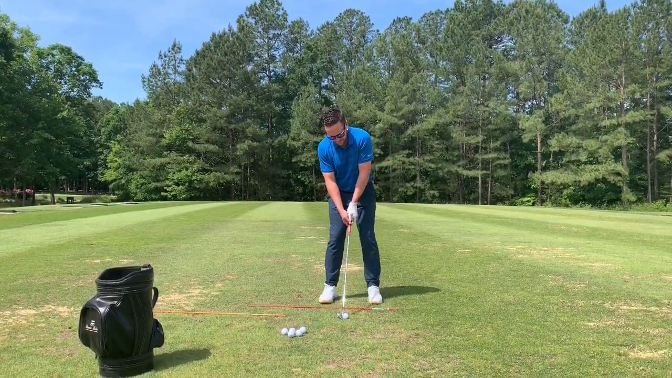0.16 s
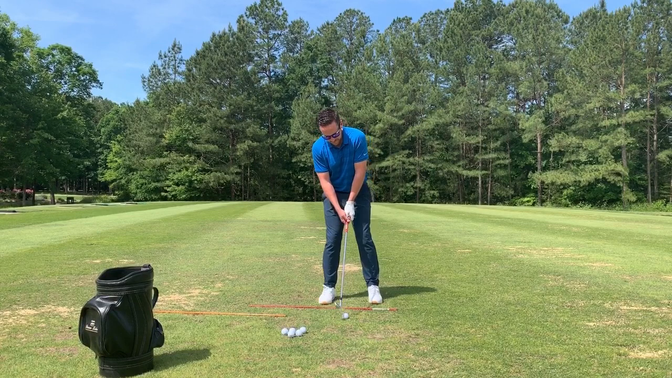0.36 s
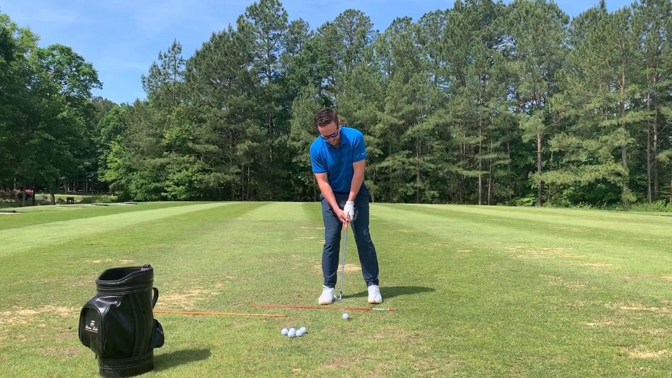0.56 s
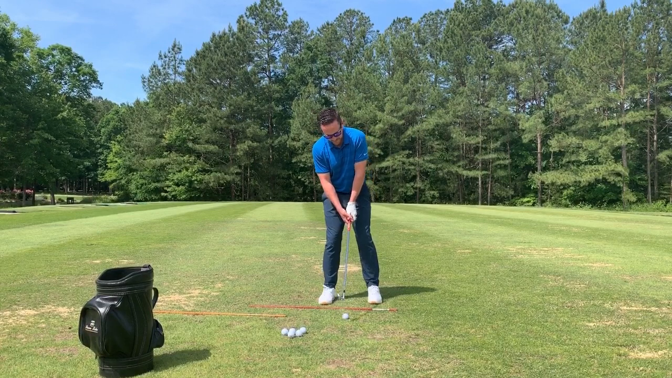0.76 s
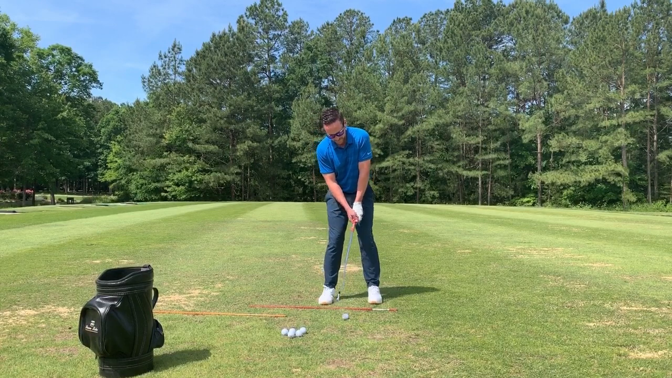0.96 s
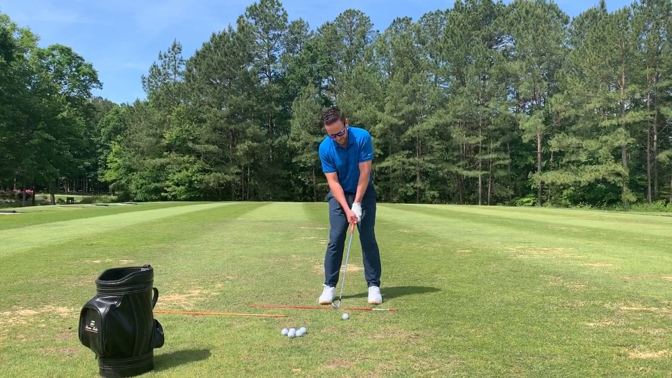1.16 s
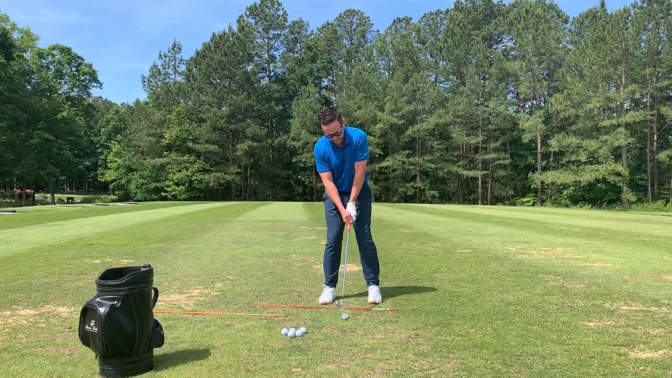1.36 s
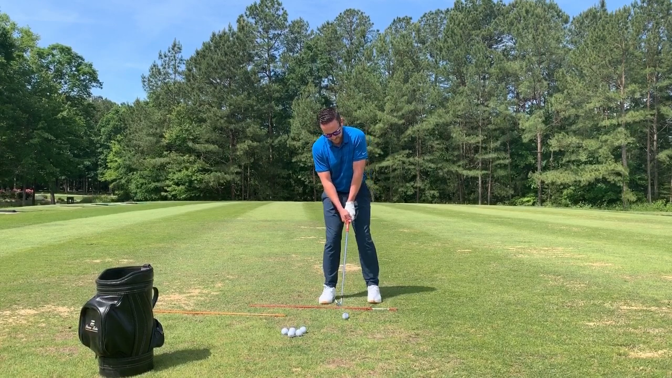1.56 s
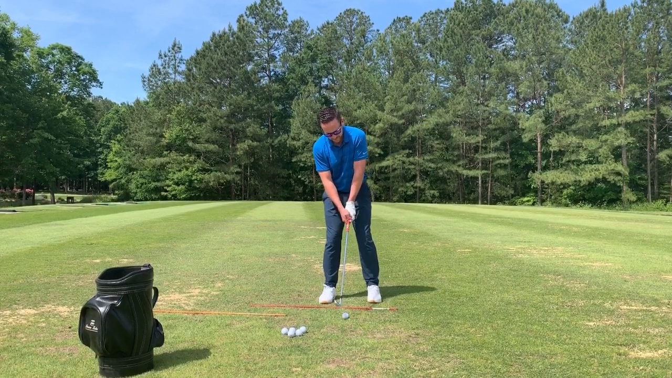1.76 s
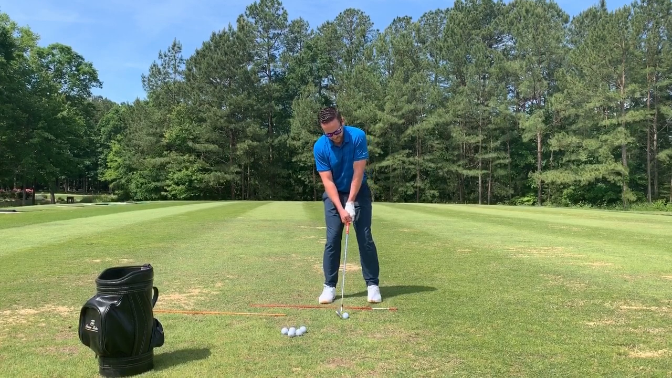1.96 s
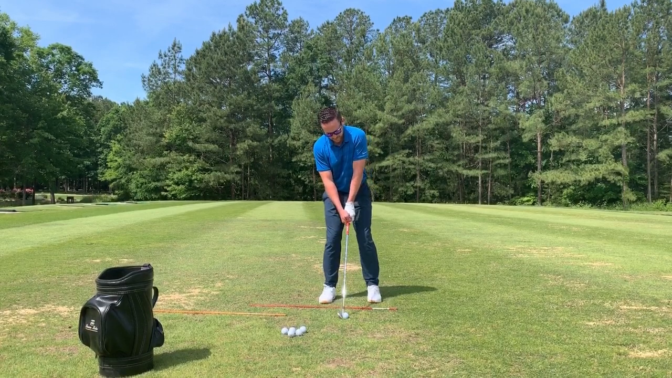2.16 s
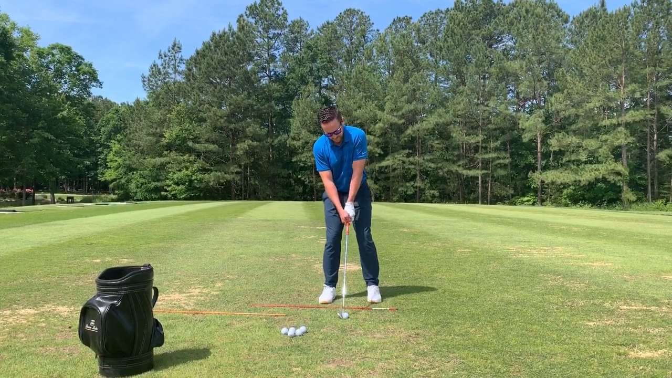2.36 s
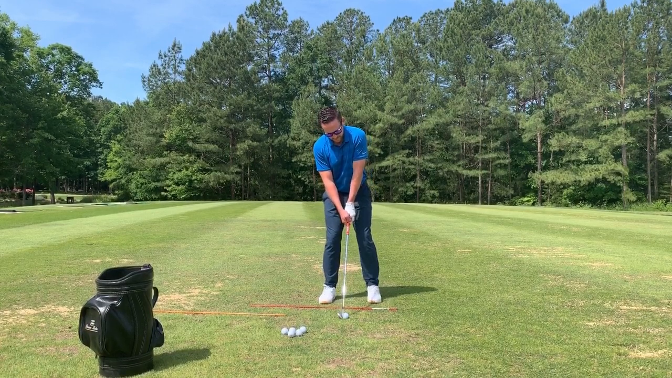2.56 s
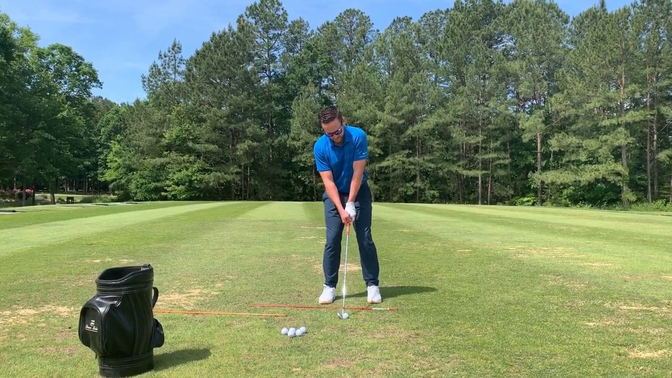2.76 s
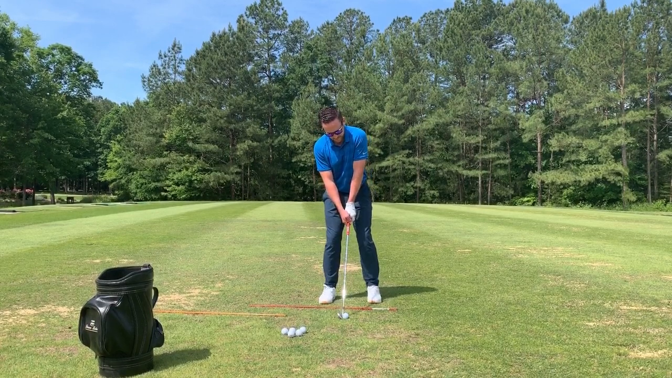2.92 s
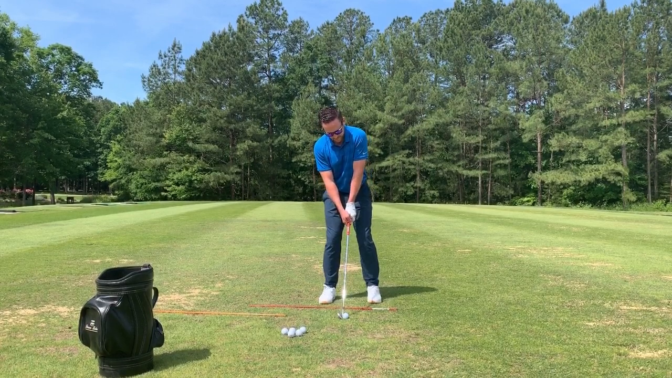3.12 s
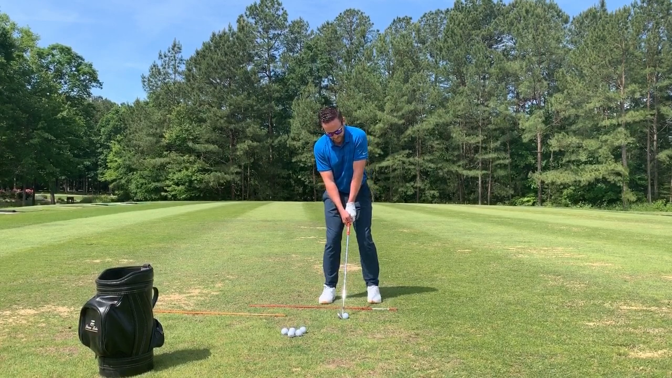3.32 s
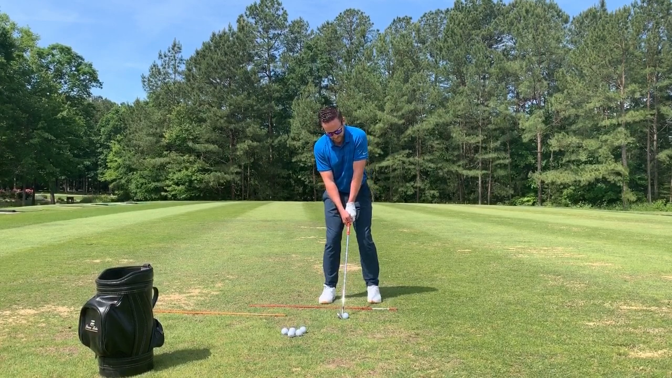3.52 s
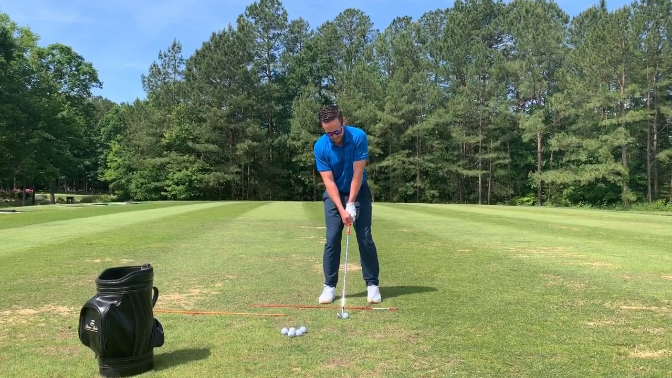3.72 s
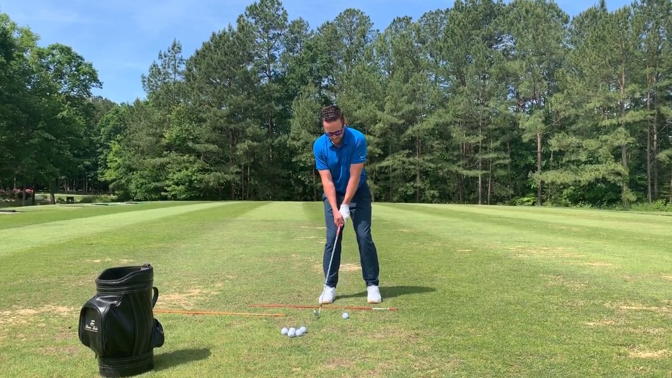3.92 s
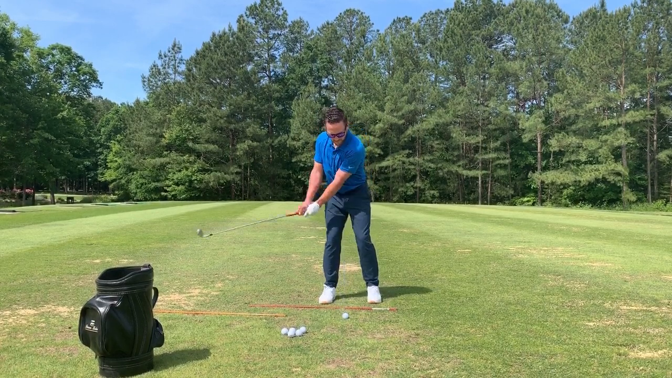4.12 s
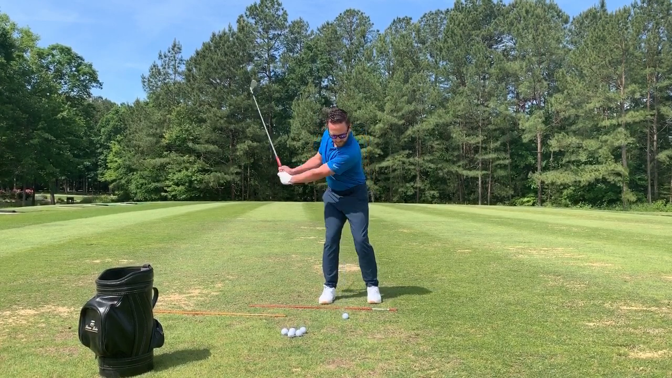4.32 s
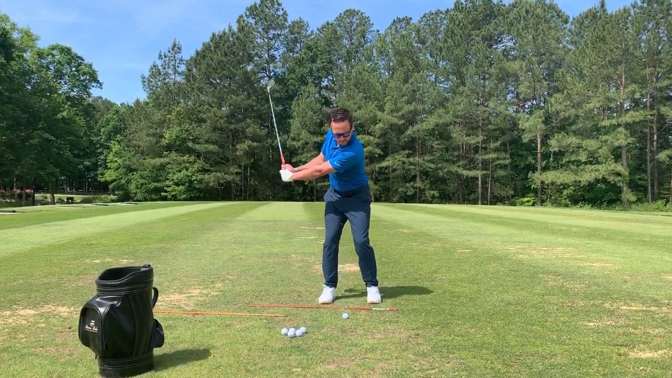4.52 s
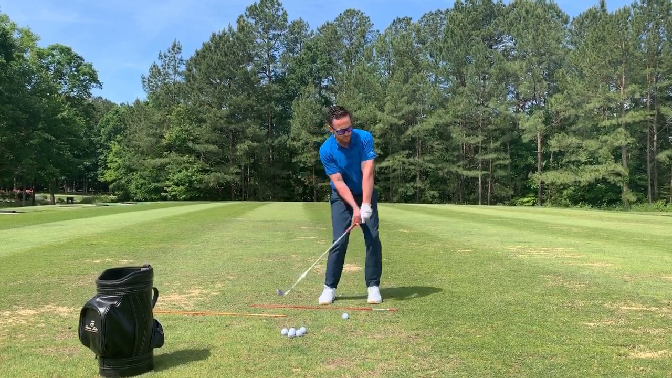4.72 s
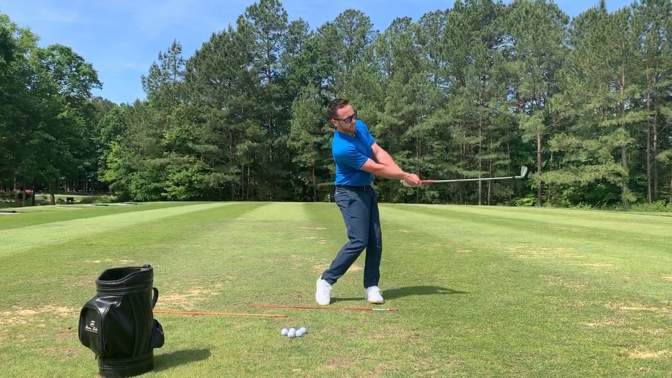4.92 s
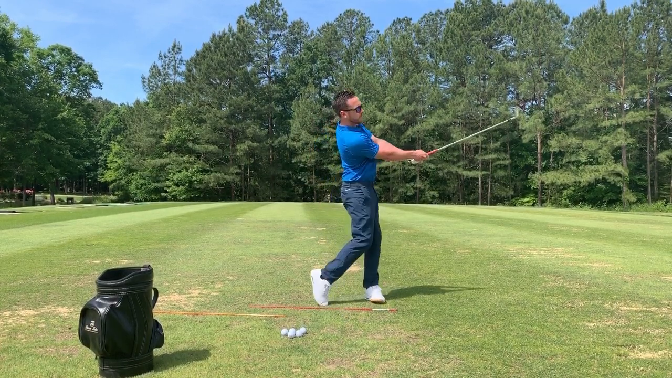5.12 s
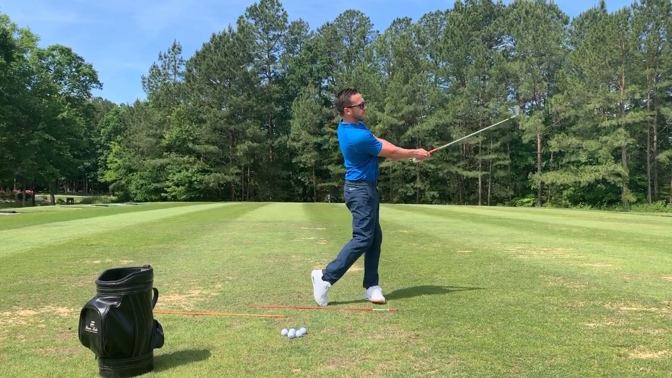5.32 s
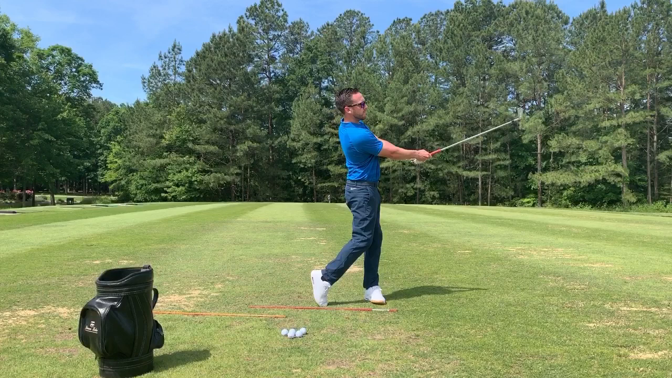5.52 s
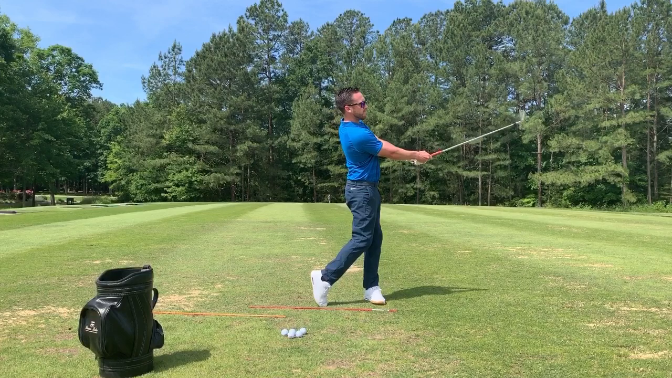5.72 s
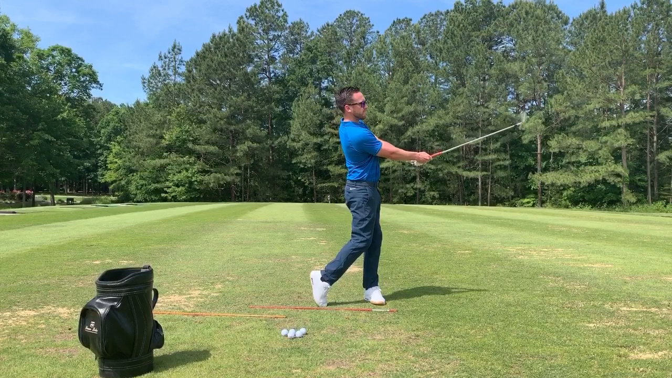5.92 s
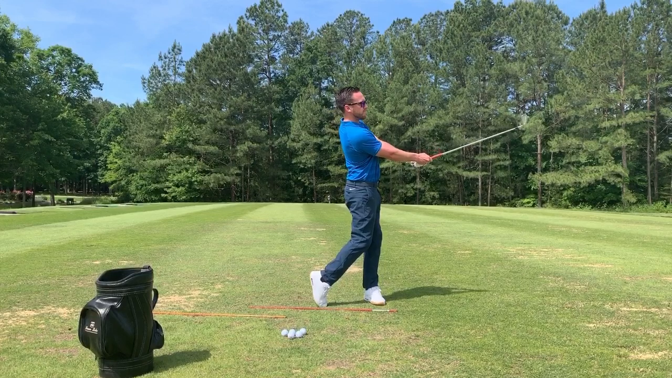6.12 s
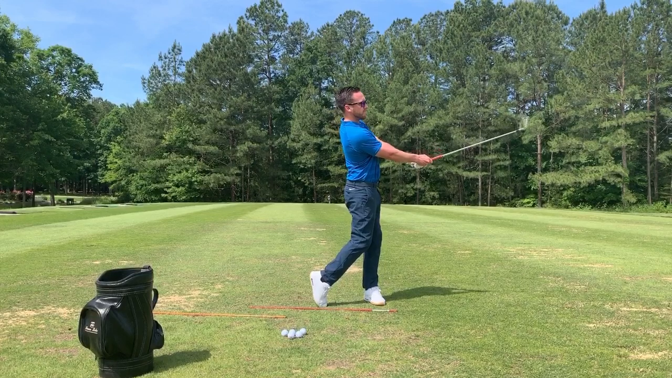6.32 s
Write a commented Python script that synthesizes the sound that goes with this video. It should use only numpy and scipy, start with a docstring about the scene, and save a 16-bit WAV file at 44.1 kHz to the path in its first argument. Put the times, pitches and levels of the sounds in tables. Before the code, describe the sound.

Small birds whistle, peep and buzz faintly in the trees over a low outdoor rumble and softly rustling leaves. A distant engine speeds up, changes gear and drones on. Late on, a nearby golf iron gives a brief swish and strikes a ball with one sharp click and a thump of turf. A little grass and soil scatters, the click echoes faintly off the trees, and the birds carry on.

```python
"""Iron shot on a wooded golf range

An iron swishes down and strikes a ball off turf: the face clicks, the ball rings, the ground
thumps, then grass and soil fly and the trunks throw the click back. Birds whistle, peep and
buzz among the trees. Far off, an engine speeds up and changes gear over a low hum, thin
whines, rumble and rustling leaves."""
import sys
import numpy as np
from scipy import signal
from scipy.fft import rfft, irfft, next_fast_len
from scipy.io import wavfile
from scipy.ndimage import map_coordinates

SR = 44100
rng = np.random.default_rng(int(sys.argv[2]) if len(sys.argv) > 2 else 0)


def pcm_store(signal):
    """Save signal as 16-bit PCM."""
    levels = np.round(np.clip(np.atleast_2d(signal), -1, 1) * 32767)
    wavfile.write(sys.argv[1], SR, levels.astype(np.int16).T)


N = 285588
TIME = np.arange(N) / SR
CONTACT_S = 4.8422
DIG_S = CONTACT_S + 0.0062  # the sole tears the turf just after contact

# Tone colour of brushed and flying grass: freq_hz, level_db
GRASS_COLOUR = [(300, -35), (600, -7), (1400, -4.5), (3000, -12.5), (6500, -19.5), (10000, -38),
                (16000, -59)]


def amp(db):
    return 10 ** (np.asarray(db) / 20)


def unit(x):
    return x / np.sqrt(np.mean(x ** 2) + 1e-20)


def phase(hz):
    return 2 * np.pi * np.cumsum(hz) / SR


def along(points, hz):
    """Read (freq_hz, value) points on a log frequency axis."""
    freqs, values = np.transpose(points)
    return np.interp(np.log(hz + 1), np.log(freqs + 1), values)


def curves(rows):
    """One value per sample for each column after the time."""
    times, *columns = np.transpose(rows)
    return [np.interp(TIME, times, column) for column in columns]


def wobble(rate):
    """A smooth random curve, rate knots a second."""
    return map_coordinates(rng.standard_normal(int(N * rate / SR) + 4), [TIME * rate])


def tent(start_s, end_s, db, rise_db_s=0, fall_db_s=0):
    """Gain that rises until start_s, holds until end_s and falls; slopes in dB per second."""
    early, late = np.maximum(start_s - TIME, 0), np.maximum(TIME - end_s, 0)
    return amp(db - rise_db_s * early - fall_db_s * late)


def filtered(x, response):
    """Equalise x by a gain per frequency; mirrored ends keep the edges free of clicks."""
    edge, size = SR // 10, next_fast_len(N + SR // 2)
    padded = np.pad(x, [(0, 0), (edge, edge)], "reflect")
    spectrum = rfft(padded, size) * response(np.fft.rfftfreq(size, 1 / SR))
    return irfft(spectrum, size)[..., edge:edge + N]


def bandpass(x, order, band_hz):
    return signal.lfilter(*signal.butter(order, band_hz, "bandpass", fs=SR), x)


def panned(x, balance):
    """Pan each frequency by its own amount."""
    return filtered(x, lambda hz: amp(along(balance, hz) * [[.5], [-.5]]))


def rush(colour, likeness):
    """Coloured stereo noise of rms 1; likeness is the left-right correlation by frequency."""
    def mid_side_gains(hz):
        angle = np.arccos(np.clip(along(likeness, hz), -1, 1)) / 2
        return amp(along(colour, hz)) * [np.cos(angle), np.sin(angle)]
    mid, side = filtered(rng.standard_normal((2, N)), mid_side_gains)
    return unit(np.array([mid + side, mid - side]))


def add(out, start_s, sound, pan_db=0):
    """Mix a sound in at start_s; pan_db is left minus right."""
    at = round(start_s * SR)
    part = out[:, max(at, 0):][:, :sound.shape[-1] + min(at, 0)]
    stereo = amp([[pan_db / 2], [-pan_db / 2]]) * sound
    part += stereo[:, max(-at, 0):][:, :part.shape[1]]


def during(curve, start_s, length_s):
    """A note-long stretch of a modulation curve."""
    return curve[round(abs(start_s) * SR):][:round(length_s * SR)]


def note(pitch, db):
    """A sine on a pitch track, with soft ends."""
    envelope = np.abs(np.sin(np.linspace(0, np.pi, len(pitch)))) ** 0.49
    return amp(db) * np.sqrt(2) * envelope * np.sin(phase(pitch))


def woods(x, dry_db, wet_db, t60_s):
    """The sound trails off among the trunks; moving leaves blur the answer."""
    t = np.arange(round(.6 * SR)) / SR
    tail = rng.standard_normal((2, len(t))) * amp(-60 * t / t60_s)
    blur = unit(1 + 1.3 * wobble(250))
    wet = signal.fftconvolve(blur * x, tail / np.linalg.norm(tail[0]), axes=1)[:, :N]
    return amp(dry_db) * x + amp(wet_db) * wet


def air():
    """Low rumble, leaves and far traffic swell with the gusts over a steady faint high hiss."""
    # Ambience levels: time_s, rumble_db, leaves_and_traffic_db
    levels = [(0.0, -47.5, -62.5), (0.83, -46, -60.5), (1.49, -48, -61), (2.29, -50, -65.5),
              (4.02, -50.5, -65.5), (5.1, -48, -64.5), (6.48, -51, -70)]
    # Tone colours of the three beds: freq_hz, level_db
    rumble_colour = [(15, -25.5), (30, -14.5), (42, -8), (65, -2.5), (110, -10), (180, -19), (320, -37),
                     (500, -55), (1000, -120)]
    leaves_colour = [(150, -30.5), (250, -3), (339, -7.5), (493, -9), (541, -10.5), (838, -16.5),
                     (1350, -18), (2670, -30.5), (3520, -39), (6000, -49.5), (7800, -79.5), (13200, -120)]
    hiss_colour = [(2060, -28), (3500, -2.5), (4460, -2.5), (7230, -8.5), (9260, -2), (10500, -8),
                   (11300, -19), (13700, -2), (16000, -24)]
    # Stereo likeness: freq_hz, correlation
    likeness = [(60, 0.93), (130, 0.93), (290, 0.86), (640, 0.088), (1410, -0.033), (3100, -0.46),
                (6820, 0.21), (15000, -0.06)]
    # Stereo balance: freq_hz, pan_db
    balance = [(60, -3.5), (240, -0.5), (950, 0), (3770, 1), (15000, -7)]
    rumble_db, leaves_db = curves(levels)
    gust = wobble(2.3)
    rumble = amp(rumble_db + 0.92 * gust) * rush(rumble_colour, likeness)
    leaves = amp(leaves_db + .8 * gust + .7 * wobble(11)) * rush(leaves_colour, likeness)
    hiss = amp(-83) * rush(hiss_colour, [(1000, 0.042)])
    return panned(rumble + leaves, balance) + hiss


def hum(pitch_hz=51, level_db=-49, swell_db=3.5):
    """A low machine hum that drifts in pitch and slowly swells."""
    swell = amp(swell_db * wobble(7.5))
    return amp(level_db) * unit(swell * np.sin(phase(pitch_hz + 1.8 * wobble(8.2))))


def whines(fade_db_s=60.5):
    """Thin, wavering machine tones fade in, hold and fade out."""
    # Held tones: start_s, end_s, pitch_hz, level_db
    tones = [(2.095, 3.4, 539, -73), (3.7, 4.2, 544.3, -75.5), (5.6, 5.8, 1775, -83),
             (6.33, 6.41, 1780, -82)]
    out = np.zeros(N)
    for start_s, end_s, hz, db in tones:
        tone = amp(4 * wobble(16)) * np.sin(phase(hz * (1 + .006 * wobble(28))))
        out += tent(start_s, end_s, db, fade_db_s, fade_db_s) * unit(tone)
    return out


def engine():
    """A far engine's firing harmonics sweep through exhaust resonances and flutter on their way."""
    # It pulls, changes gear and drives off: time_s, firing_hz, level_db, loss_per_order_db, flutter_db
    drive = [(0, 119.3, -53, -2, 1), (.4, 135.5, -48, 1, 1.5), (.6, 142.4, -47.5, -1, 1.5),
             (.8, 150.9, -45, 7, 1), (1.1, 162.3, -46.5, 7, 1.5), (1.4, 172.5, -57.5, 0.5, 2.5),
             (2.2, 190.4, -59, 3, 3), (2.4, 180.3, -70, 11, 4), (2.75, 110, -64.5, 8, 3.5),
             (2.95, 107.8, -52, 5.5, 3), (3.4, 107.2, -53, -1, 3), (3.8, 109.3, -51, -1, 3),
             (4.2, 112.9, -53, 7.5, 2.5), (4.6, 115.7, -55.5, 6, 3), (5.1, 117.1, -66.5, 6.5, 3),
             (6.48, 110.5, -58, 17, 3)]
    # First to fourth order of the firing: level_db
    orders = [0, -10, -17.5, -29.5]
    # Exhaust resonances: freq_hz, gain_db
    exhaust = [(110, -1.5), (150, 3), (188, -3.5), (225, 1.5), (272, 6), (330, -4), (425, 0), (480, -11),
               (565, 7.5), (650, -13)]
    firing_hz, level_db, loss_db, flutter_db = curves(drive)
    firing = phase(firing_hz * (1 + .015 * wobble(18)))
    out = np.zeros(N)
    for order, order_db in enumerate(orders, start=1):
        db = level_db + order_db - (order - 1) * loss_db + along(exhaust, order * firing_hz)
        db += flutter_db * (.6 * wobble(7.7) + wobble(22))
        jitter = flutter_db / 3.5 * wobble(16)
        out += amp(db) * np.sqrt(2) * np.sin(order * firing + jitter)
    return out


def ticks(t60_s=0.012):
    """Faint dry ticks: puffs of noise that die within milliseconds."""
    # Ticks: start_s, level_db, centre_hz
    puffs = [(4.14, -57.5, 3300), (5.0745, -61, 8000), (5.13, -67, 8500), (5.36, -68, 10500)]
    out, t = np.zeros((2, N)), np.arange(SR // 100) / SR
    for start_s, db, hz in puffs:
        puff = amp(db - 60 * t / t60_s) * rng.standard_normal((2, len(t)))
        add(out, start_s, bandpass(puff, 2, [.6 * hz, 1.45 * hz]))
    return out


def chirps(centre_hz, spread, count):
    """Many tiny steep chirps at random moments deep in the woods, rms 1."""
    out = np.zeros((2, N))
    for when, high, slide, loud, side, length in rng.random((count, 6)):
        glide = np.linspace(1, 1.12 - 0.53 * slide, round((0.008 + 0.012 * length) * SR))
        pitch = centre_hz * np.exp(spread * (2 * high - 1)) * glide
        add(out, when * N / SR, note(pitch, 9 * loud), pan_db=8 * (side - .5))
    return unit(woods(out, dry_db=-8, wet_db=0, t60_s=.4))


def far_chatter(rasp):
    """Small birds chatter far away in two registers, the upper one raspy."""
    # Chatter levels: time_s, low_voices_db, high_voices_db
    levels = [(0, -69.5, -86), (.7, -76.5, -91), (1.2, -81.5, -91), (2.2, -100, -93), (2.4, -100, -84),
              (2.9, -93, -82), (3.6, -79.5, -86), (4.3, -90.5, -91.5), (6.48, -75.5, -93)]
    low_db, high_db = curves(levels)
    low = amp(low_db) * chirps(2350, spread=.115, count=500)
    high = amp(high_db) * rasp * chirps(4000, spread=.17, count=800)
    return low + high


def bird_peeps(quaver, roughness):
    """Short rough peeps and tiny high pips, each a straight glide."""
    # Scattered peeps: start_s, length_s, pitch_hz, level_db, glide_hz
    peeps = [(.595, 0.018, 3500, -71.5, 100), (2.615, 0.058, 3210, -76.5, 152),
             (2.665, 0.11, 6200, -90, 182), (2.64, 0.018, 4520, -83, 100), (2.72, .02, 4500, -82, -100),
             (2.8, 0.019, 4450, -83, -200), (2.845, 0.08, 4963, -81, -420), (2.9, .045, 3250, -82, -300),
             (2.74, .03, 3720, -82, 0), (2.86, 0.013, 3980, -83, 0), (2.99, 0.061, 4010, -83, 200),
             (3.025, 0.051, 3080, -76, -150), (3.115, .08, 3950, -83, -150), (3.41, 0.028, 3600, -76, 203),
             (3.525, 0.03, 4037, -78, 0), (4.09, .02, 8250, -82, 0), (5.436, 0.031, 3290, -76.5, -50),
             (6.0, 0.029, 2000, -73, 60), (6.052, 0.02, 3680, -77.5, 0)]
    # A row of rising pips: start_s, level_db
    pips = [(5.355, -84), (5.449, -89), (5.54, -88), (5.635, -86), (5.73, -85)]
    calls = peeps + [(s, .02, 5320, db, 300) for s, db in pips]
    out = np.zeros((2, N))
    for start_s, length_s, hz, db, glide_hz in calls:
        pitch = hz + glide_hz * np.linspace(-.5, .5, round(length_s * SR))
        add(out, start_s, note(pitch * during(quaver, start_s, length_s), db))
    return woods(roughness * out, dry_db=-5.5, wet_db=-5, t60_s=.35)


def bird_buzzes():
    """A fast, irregular warble in pitch turns high notes into buzzes."""
    # A repeated buzz: start_s, level_db
    buzzes = [(.468, -79), (1.142, -78.5), (1.775, -80.5), (2.485, -79.5), (3.235, -79), (3.945, -82),
              (5.605, -81), (6.31, -79)]
    # A high buzzy phrase: start_s, pitch_hz, level_db
    trill = [(3.179, 8970, -74), (3.362, 8710, -70.5), (3.534, 8840, -70.5), (3.736, 8860, -71.5),
             (3.905, 8620, -77.5)]
    warble = np.sin(phase(110 + 45 * wobble(78)))
    out = np.zeros((2, N))

    def buzz(start_s, hz, db, length_s, width_hz, dwell, pan_db):
        """With dwell, the warble lingers at the bottom and flicks upward."""
        bend = during(warble, start_s, length_s)
        tone = note(hz + width_hz * (bend + dwell * bend ** 2), db - 5 * dwell * bend)
        add(out, start_s, tone * np.hanning(len(bend)) ** 0.5, pan_db)

    for start_s, db in buzzes:
        buzz(start_s, 6760, db, length_s=0.078, width_hz=640, dwell=.5, pan_db=-2)
    for start_s, hz, db in trill:
        buzz(start_s, hz, db, length_s=0.051, width_hz=260, dwell=0, pan_db=-1.5)
    return woods(out, dry_db=-4.5, wet_db=2, t60_s=0.3)


def bird_whistles(quaver, rasp, hoarse, song_pan_db=4.5, fall_hz_per_s=1400, rasp_below_hz=1800):
    """A songbird and a raspy low-voiced bird whistle gliding, slightly hoarse sines."""
    # Low bird's loud arch and soft second note: start_s, level_db, second_after_s, second_db
    low_calls = [(-.08, -57.5, 0.4, -69), (0.662, -64.5, 0.35, -73), (1.289, -64.5, .405, -73),
                 (1.919, -66, 0.41, -75)]
    # Songbird's arched, level, hooked and falling notes: start_s, length_s, pitch_hz, level_db
    arches = [(5.597, 0.115, 3028, -70.5), (6.202, 0.08, 3075, -69)]
    held = [(0.344, 0.045, 2990, -75), (0.857, 0.09, 3050, -67), (0.95, 0.17, 2990, -76),
            (3.266, 0.078, 2900, -78), (3.328, 0.053, 2590, -72), (3.641, 0.066, 2960, -75),
            (4.521, 0.11, 2877, -76), (4.597, 0.058, 2604, -71), (5.133, 0.049, 2220, -69),
            (5.2, 0.048, 2330, -70), (5.825, .03, 2170, -74), (6.309, 0.077, 2277, -74.5)]
    chips = [(0.07, 0.05, 2560, -73), (0.289, 0.041, 2560, -67.5), (0.392, 0.13, 2505, -71),
             (0.51, 0.038, 2560, -68), (0.848, 0.013, 3680, -70), (0.932, 0.019, 2930, -67),
             (0.924, .04, 2560, -72), (1.125, 0.035, 2590, -67.5), (3.175, 0.055, 2600, -76),
             (3.886, 0.065, 2535, -71.5), (4.441, 0.065, 2630, -72.5), (5.89, 0.038, 2550, -79),
             (6.23, .07, 2520, -76), (6.44, 0.042, 2500, -74)]
    falls = [(3.737, 0.18, 2760, -74.5), (5.151, 0.16, 2758, -71.5), (5.2, 0.096, 3083, -72.5),
             (5.718, 0.22, 2716, -68), (6.32, 0.14, 2740, -71.5)]
    # Contours at even steps through a note: pitch_ratio
    low_arch = (.88, 1, .94, .81)
    arch, hook, level = (.95, 1, .98, .9), (1, .89, .85), (.985, 1, .995)
    out = np.zeros((2, N))

    def whistle(start_s, length_s, hz, db, contour, pan_db):
        """One quavering note bent smoothly through its contour."""
        curve = np.polyfit(np.linspace(0, 1, len(contour)), contour, len(contour) - 1)
        bend = np.polyval(curve, np.linspace(0, 1, round(length_s * SR)))
        pitch = hz * bend * during(quaver, start_s, length_s)
        flutter = during(rasp, start_s, length_s) if hz < rasp_below_hz else 1
        add(out, start_s, flutter * note(pitch, db), pan_db)

    for start_s, db, after_s, second_db in low_calls:
        whistle(start_s, length_s=0.14, hz=1522, db=db, contour=low_arch, pan_db=-7.5)
        whistle(start_s + after_s, length_s=0.065, hz=1370, db=second_db, contour=level, pan_db=2)
    for notes, contour in (arches, arch), (held, level), (chips, hook):
        for row in notes:
            whistle(*row, contour, song_pan_db)
    for start_s, length_s, hz, db in falls:
        contour = 1 - fall_hz_per_s * length_s / hz * np.array([0, .5, 1])
        whistle(start_s, length_s, hz, db, contour, song_pan_db)
    return woods(hoarse * out, dry_db=-4.5, wet_db=-8.5, t60_s=.7)


def birds():
    """The chorus: quaver shakes the pitch, rasp and hoarseness flutter the level."""
    quaver = np.pad(1 + .005 * wobble(90) + .008 * wobble(350), (0, SR), "edge")
    rasp = unit(amp(3 * wobble(260)))
    hoarse = amp(2 * wobble(60) + 1.2 * wobble(300))
    calls = bird_peeps(quaver, rasp * hoarse) + bird_buzzes() + bird_whistles(quaver, rasp, hoarse)
    return far_chatter(rasp) + calls


def grit(count=200, thinning_s=.12):
    """Crumbs of soil and blades land as one-cycle clicks, ever sparser and softer after the dig."""
    out, cycles = np.zeros((2, N)), np.linspace(0, 1.5, 48)
    pulse = np.sin(2 * np.pi * cycles) * np.hanning(48) ** 1.5
    for when, high, loud, side in rng.random((count, 4)):
        delay_s = -thinning_s * np.log(1 - .93 * when)
        pitch_hz = 1700 * 2.8 ** high
        db = -59 - 4.5 * np.log(1 - .97 * loud) - 25 * delay_s
        click = np.interp(np.arange(48) * pitch_hz / SR, cycles, pulse, right=0)
        add(out, DIG_S + delay_s, amp(db) * click, pan_db=8 * (side - .5))
    return out


def turf_spray():
    """The sole tears the turf; flying grass and scattered echoes trail off, the treble first."""
    grains = amp(3 * wobble(220) + 0.68 * wobble(24))
    tear = tent(DIG_S, DIG_S, -35.5, fall_db_s=3198.5)
    trail = tent(DIG_S, DIG_S, -60.5, fall_db_s=30.5) * tent(0, DIG_S + 0.25, 0, fall_db_s=60)
    grass = (tear + trail) * rush(GRASS_COLOUR, [(1000, .55)])
    # Tone colour of a thin, high fizz after the hit: freq_hz, level_db
    fizz_colour = [(4000, -19), (7000, -8), (8800, -1), (11200, -19.5), (13000, -5.5), (14800, -9.5),
                   (15400, -33)]
    fizz = tent(DIG_S, DIG_S, -62.5, fall_db_s=129.5) * rush(fizz_colour, [(1000, .3)])
    return (TIME > DIG_S) * grains * (grass + fizz)


def swing():
    """Air rushes past the club head, loudest at contact; the sole brushes grass tips just before."""
    # Tone colour of the swish: freq_hz, level_db
    swish_colour = [(150, -30), (400, 1), (1500, -8.5), (3000, -20), (7000, -29), (15000, -46.5)]
    near_mono = [(1000, 0.99)]
    brush = (TIME < CONTACT_S) * tent(CONTACT_S, CONTACT_S, -37.5, rise_db_s=3499.5)
    swish = tent(CONTACT_S, CONTACT_S, -53.5, rise_db_s=259.5, fall_db_s=1298.5)
    return brush * rush(GRASS_COLOUR, near_mono) + swish * rush(swish_colour, near_mono)


def strike():
    """The face clicks, the ball rings, the turf thumps last; trunks send the click back, dulled."""
    # One burst per mode: pitch_hz, level_db, start_ms, swell_ms, narrowness, right_lead_ms
    modes = [(213, -16.5, 2.1, 9.3, 4.8, 0.47), (208, -35, 22, 5, 6, 0.16), (367, -34, 3, 4, 1.8, 0.13),
             (92, -33.5, 2, 16, 3.5, 0), (556, -37, 1.8, 3.6, 5.7, .15), (4990, -28, 0.15, 0.53, 2, 0),
             (1010, -18, 1.1, 2.9, 4.9, 0), (1450, -23, 0.55, 1.5, 1.4, 0.037),
             (2070, -12.5, 0.2, 1.1, 3.5, 0.039), (3010, -13.5, 0.15, 0.67, 3, 0.024),
             (3900, -18, 0.026, 1.0, 1.1, .027), (4400, -23, .1, 0.99, 1.1, .027),
             (5980, -21.5, 0.13, 1.3, 2, 0.022), (6640, -29.5, 0.056, 0.88, 0.72, 0.033),
             (7870, -30, 0.11, .6, 1.4, 0.054), (8380, -21.5, 0.022, 0.46, 1, 0.011),
             (8900, -23.5, 0.052, .8, 1.7, 0), (13300, -18, 0.046, 0.68, 3.2, 0.029),
             (14300, -27, 0.022, .5, 2.4, 0.00073)]
    # Reflections off ground and legs: delay_ms, gain_db
    bounces = [(2.2, -11.5), (4.3, -18), (5.4, -23.5), (7.5, -28)]
    # Echoes off single trunks: start_s, level_db
    echoes = [(4.869, -46), (4.967, -52), (5.0062, -48.5), (5.074, -45.5), (5.1097, -61.5), (5.155, -59)]
    # Stereo balance of the hit: freq_hz, pan_db
    balance = [(150, -1.5), (500, -1.5), (1050, 0), (2100, 2), (4000, 1.5), (8400, -0.5), (13000, -1)]
    t = np.arange(SR // 10) / SR
    out, click = np.zeros((2, N)), np.zeros((2, len(t)))
    for hz, db, start_ms, swell_ms, narrowness, lead_ms in modes:
        onsets_s = np.array([[start_ms + lead_ms], [start_ms]]) / 1000
        age_s = np.maximum(t - onsets_s, 0)
        swell = age_s / swell_ms * 1000
        envelope = (swell * np.exp(1 - swell)) ** narrowness
        click += amp(db) * envelope * np.sin(2 * np.pi * hz * age_s)
    noise = rng.standard_normal(len(t)) + 0.21 * rng.standard_normal((2, len(t)))
    crack = amp(-23.5 - 60 * t / 0.018) * noise
    add(out, CONTACT_S, click + crack)
    bright = bandpass(click * amp(-60 * t / .008), 2, [1500, 14000])
    for delay_ms, db in bounces:
        add(out, CONTACT_S + delay_ms / 1000, amp(db) * bright)
    dulled = bandpass((click + 3 * crack) * amp(-60 * t / .012), 3, [900, 6000])
    for start_s, db in echoes:
        add(out, start_s, amp(db) * dulled / np.abs(dulled).max())
    return panned(out, balance)


def scene():
    """The shot up front, with machines, air and birds behind it."""
    shot = strike() + turf_spray() + swing() + grit()
    machines = (engine() + hum()) * amp([[-1.4], [1.4]]) + whines()  # engine and hum sit to the right
    return shot + machines + air() + birds() + ticks()


def record(dry, top_hz=16360):
    """A steep high cut: nothing passes above top_hz."""
    return filtered(dry, lambda hz: np.clip((top_hz - hz) / 200, 0, 1) ** 2)


dry = scene()
out = record(dry)
pcm_store(out)
```